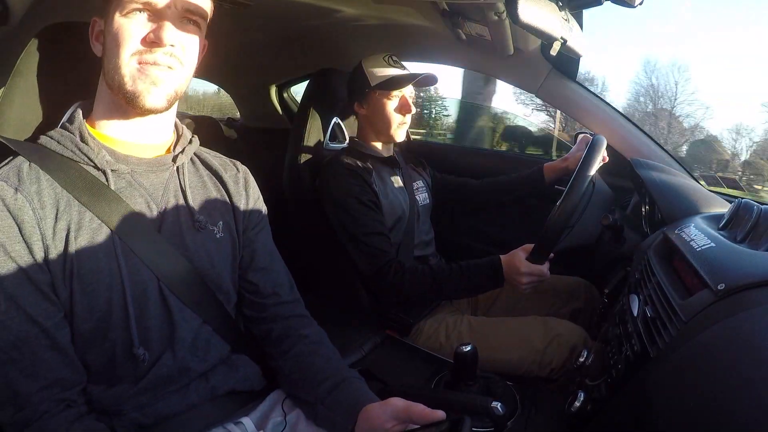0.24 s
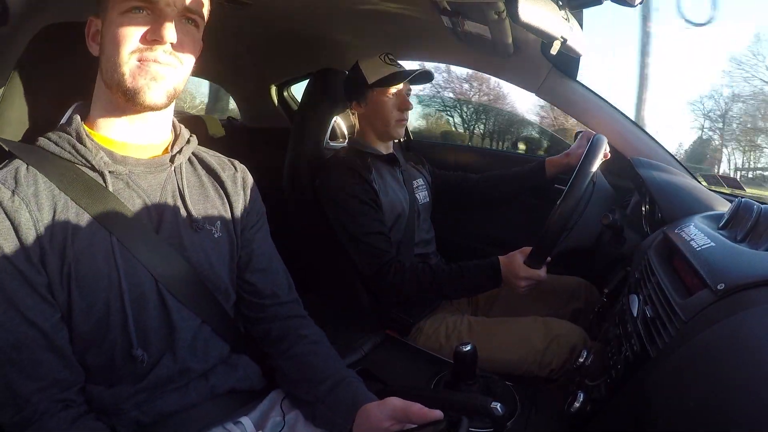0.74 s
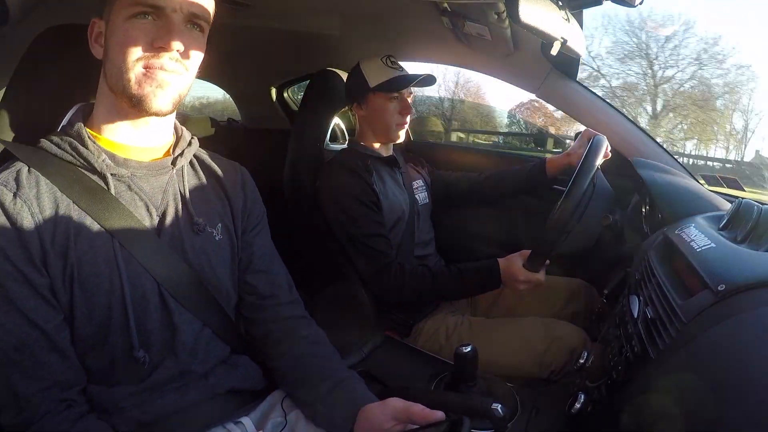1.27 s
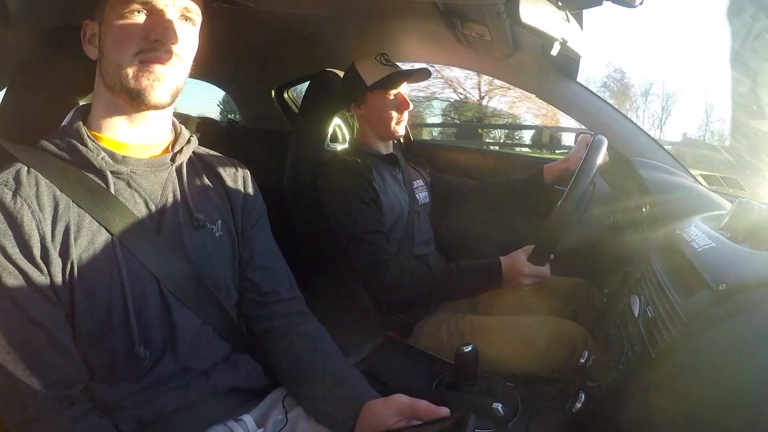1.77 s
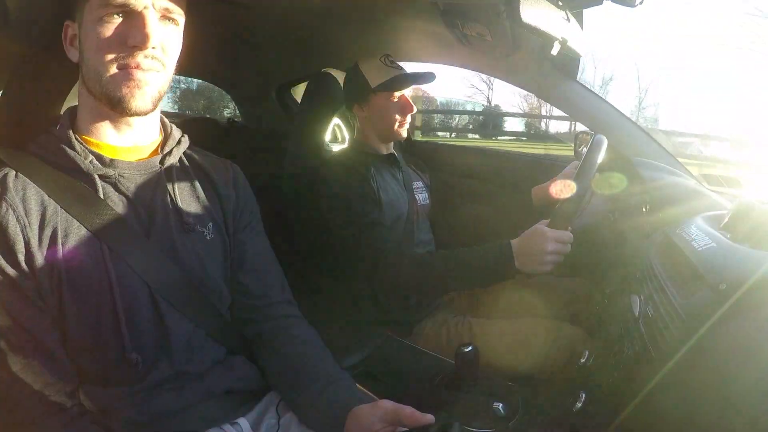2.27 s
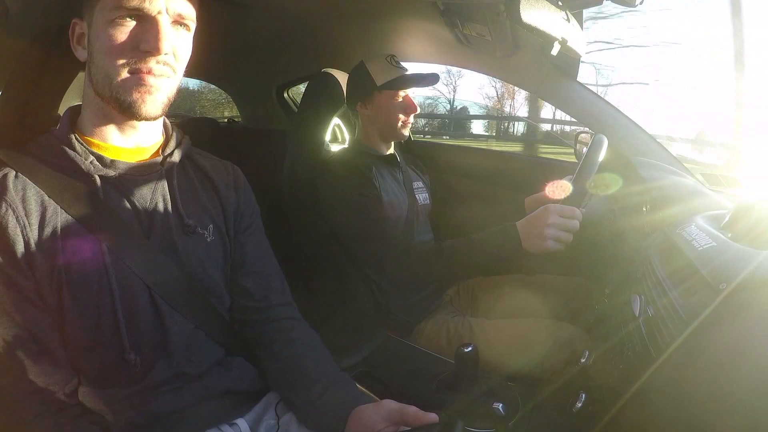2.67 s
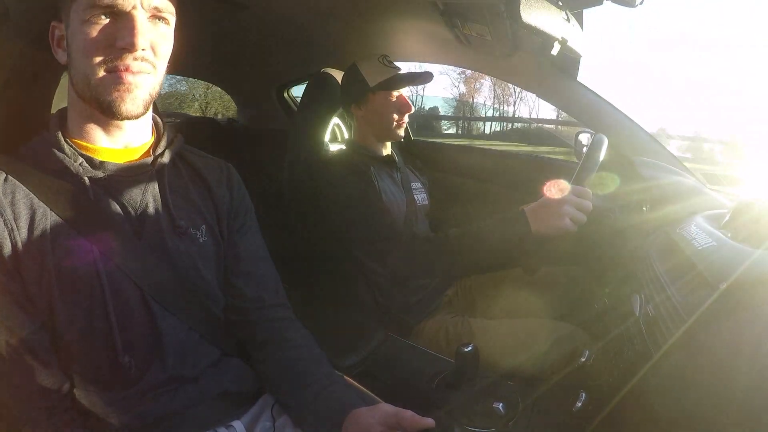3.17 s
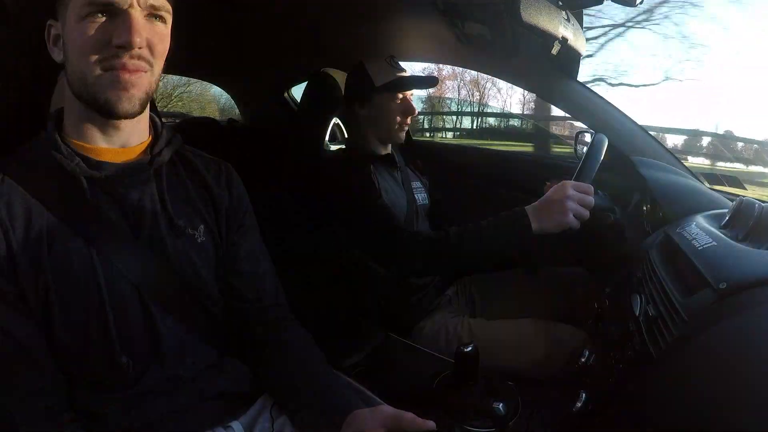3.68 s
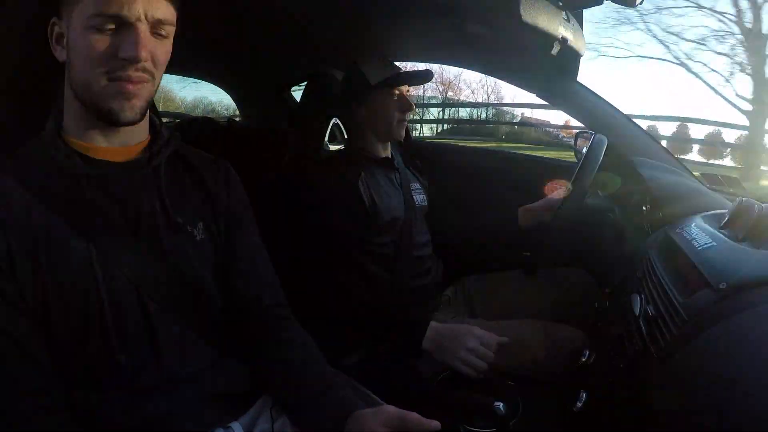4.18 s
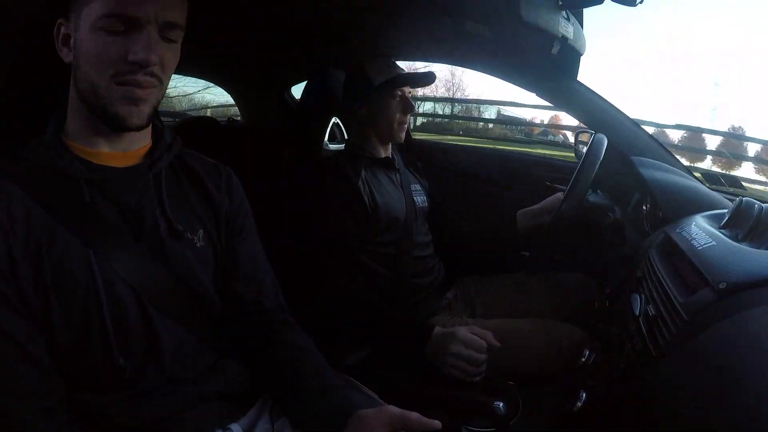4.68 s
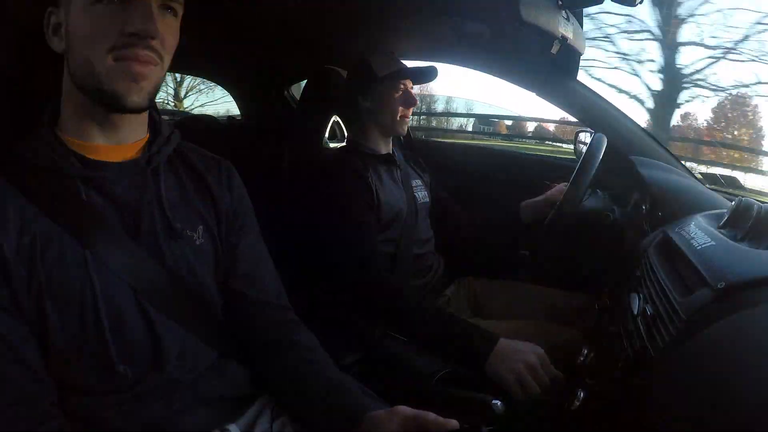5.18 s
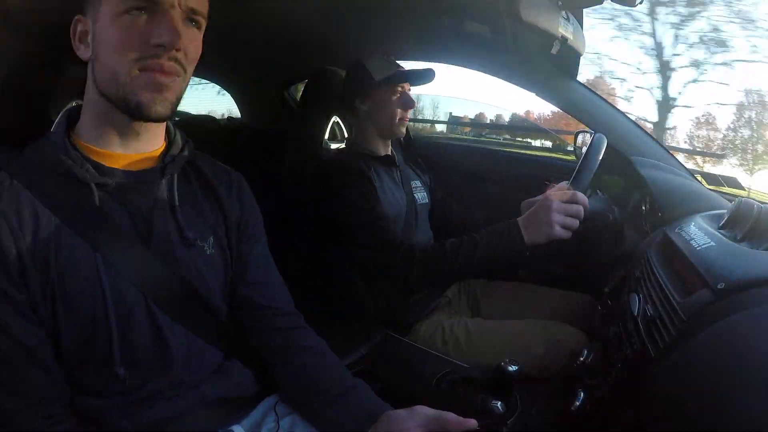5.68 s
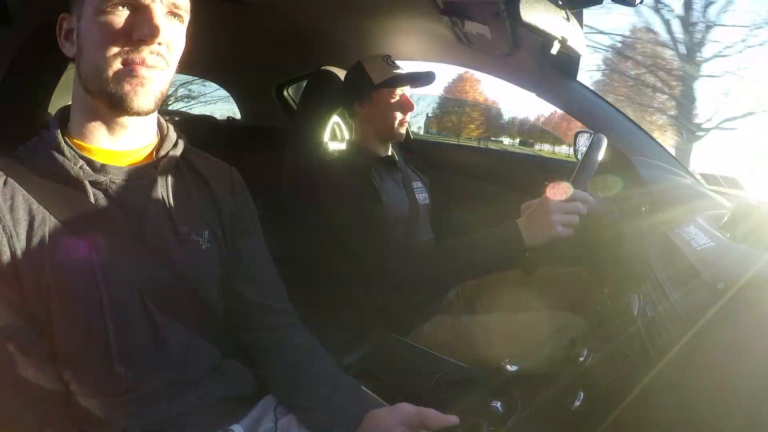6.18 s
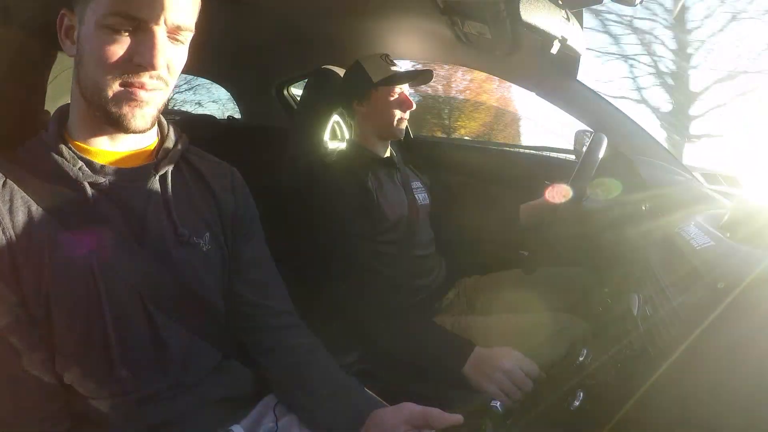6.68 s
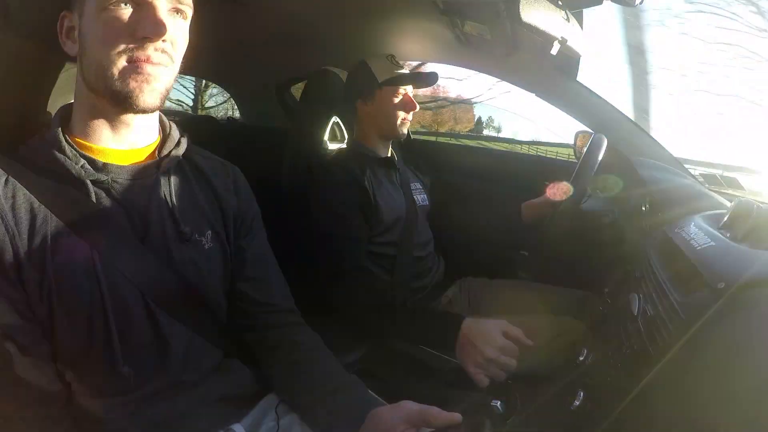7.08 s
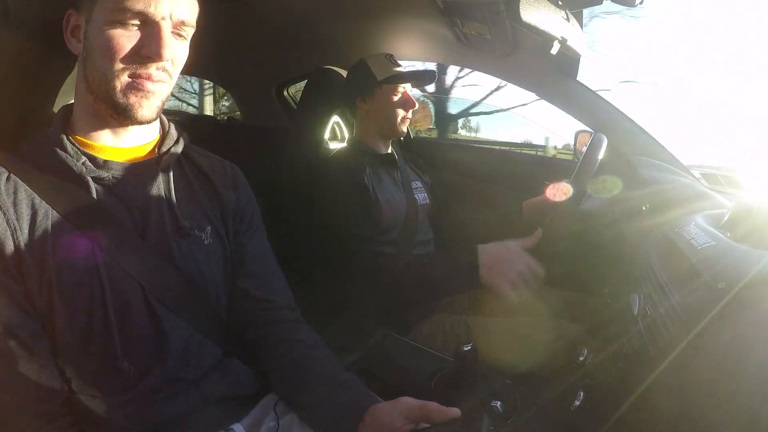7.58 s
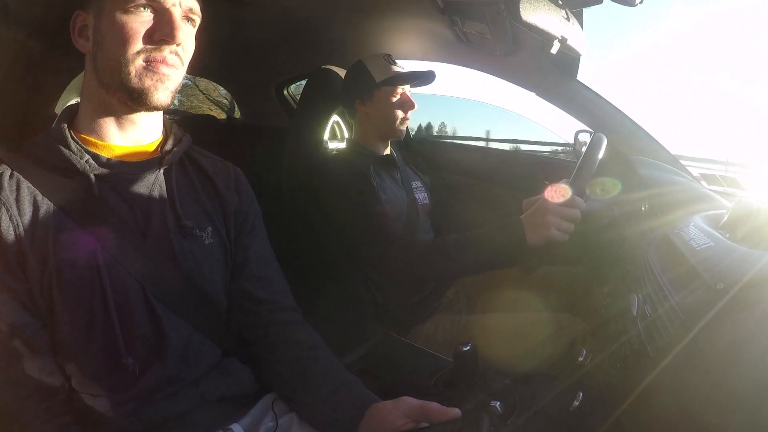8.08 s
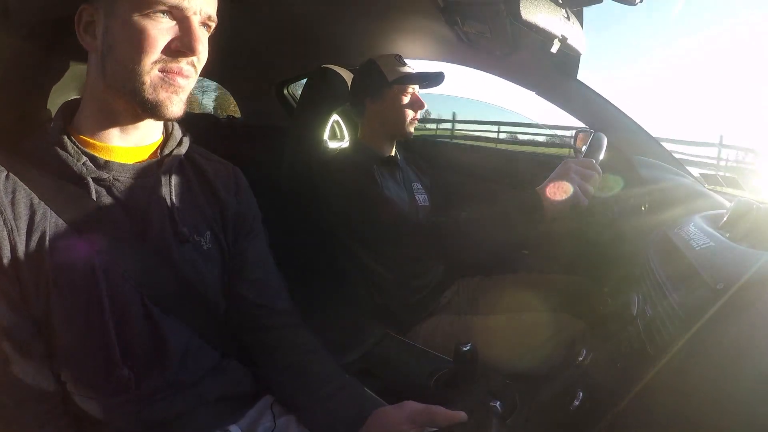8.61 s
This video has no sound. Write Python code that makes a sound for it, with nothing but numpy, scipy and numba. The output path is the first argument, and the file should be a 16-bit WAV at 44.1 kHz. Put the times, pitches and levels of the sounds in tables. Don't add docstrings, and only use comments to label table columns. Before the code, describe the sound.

An outdoor microphone beside the exhaust catches a rotary car accelerating through one gear: soft droning first, then a hard, metallic buzzing pull with rising pitch and hiss. A sudden lift drops the loudness, followed by faltering, a sharp pop and a dull stone knock. The engine coasts down, flares briefly for a downshift, pops and settles. Road roar, buffeting gusts and tiny high metallic clinks surround it.

```python
import sys
import numpy as np
from scipy import signal
from scipy.fft import rfft, irfft, next_fast_len
from scipy.io import wavfile
from scipy.ndimage import uniform_filter1d
from numba import njit

SR = 44100
rng = np.random.default_rng(int(sys.argv[2]) if len(sys.argv) > 2 else 0)


def linear_from_db(decibels):
    return 10 ** (np.asarray(decibels, float) / 20)


def digitize_waveform(pressure):
    field = np.atleast_2d(pressure).T
    bounded = np.clip(field, -1, 1)
    quanta = np.round(bounded * 32767).astype(np.int16)
    wavfile.write(sys.argv[1], SR, quanta)


N = 390279
MID_REVS_HZ = 185

# t/s, f/Hz
PULL_REVS = [(0, 155.7), (.35, 152.3), (1.4, 157.6), (1.8, 162.3), (2.3, 173), (3, 191.9), (3.9, 218),
             (4.5, 234.9), (5.04, 250.2)]
COAST_REVS = [(5.25, 229.7), (5.451, 212.8), (5.54, 208), (5.58, 189.7), (5.68, 168.7), (5.851, 172),
              (6.4, 167.7), (7.18, 155.2), (7.68, 116.3)]
BLIP_REVS = [(7.71, 115.6), (7.78, 141.5), (7.861, 178.8), (7.895, 188.7), (7.971, 198), (8.06, 203.3),
             (8.2, 197.8), (8.4, 190.8), (8.85, 169.6)]
# t/s, opening/0-1
PEDAL = [(.25, 0), (.6, .05), (1.05, .25), (1.15, .35), (1.4, .4), (1.9, .64), (2.3, .86), (2.75, 1.0),
         (5.04, 1.0), (5.055, 0), (7.705, 0), (7.71, .85), (7.78, .75), (7.883, .85), (7.895, 0)]
# deepest t/s, change level/dB, fall/s, recovery/s
STUMBLES = [
    (.23, -13.5, 4.3, 0.23),
    (5.119, -19.5, 0.17, 0.34),
    (5.53, -27, .022, 0.024),
    (5.557, 7.5, .015, .02),
    (5.63, -9, 0.1, 0.058),
    (5.79, -5, 0.11, 0.049),
    (7.703, -16, 0.046, 0.0082),
    (7.895, -8, 0.016, 0.035),
    (7.9, -9.5, 0.017, 0.2),
    (8.105, -23, .025, 0.011),
]
# firing f/Hz, shut level/dB, wide open level/dB
BOOM_ANSWER = [(115, -18, -2.5), (149.4, -21, -6), (178.5, -16, -9), (180, -18, -8.5), (193, -20.5, -10),
               (198, -19.5, -13), (212, -18.5, -8), (247, -15.5, -11.5)]
OCTAVE_ANSWER = [(116, -39.5, -14), (149, -37.5, -29.5), (191, -31.5, -54), (198, -23.5, -51),
                 (213.5, -27, -25), (240, -28, -19), (226, -41, -28.5), (270, -43, -46.5)]
BARK_ANSWER = [(127, -61, -12.5), (139, -43, -5.5), (160.5, -38.5, -11), (172, -31, -10.5),
               (179, -33.5, -9), (216.3, -35.5, -9), (243.7, -27.5, -15.5), (245, -37.5, -13)]
# t/s, level/dB
WHINE = [(0, -43), (.5, -39), (1.2, -38), (2, -54), (8.85, -66)]
# f/Hz, width/Hz, level/dB, dull rotor share/0-1
BARK_MODES = [(484, 44, 6, 0.99), (586, 140, 2, 1), (752, 60, 0.5, 0.29)]
HOT_MODES = [(1222, 215, 11.5, 0.48), (1640, 200, -1, 0.29)]
COOL_MODES = [(1148, 71, 2, 0), (1320, 68, -8.5, 0), (980, 83, -8, .1), (1690, 110, -12, 0)]
EDGE_MODES = [(1716, 180, 0.5, 0.044), (2007, 200, -3.5, 0.15), (2410, 85, -4, 0.022),
              (2990, 200, -35, 0.13), (3784, 73, -10, 0.15), (3950, 133, -12.5, .1), (4150, 250, -10.5, .1)]
# f/Hz, level/dB
GAS_COLOUR = [(1500, -20.5), (2500, -5.5), (3300, -11), (3700, -5), (4200, -3.5), (4700, -7.5), (5400, -10),
              (6000, -6.5), (7100, 1), (8000, -8.5), (10000, -14), (12500, -26.5), (14500, -41),
              (15300, -52)]
# t/s, hiss level/dB, length/s
PUFFS = [
    (5.036, -43.5, 0.054),
    (5.558, -45, 0.015),
    (5.595, -27, .022),
    (5.621, -39, 0.015),
    (7.709, -29.5, 0.02),
    (7.764, -32, 0.023),
    (8.097, -32.5, 0.007),
    (8.105, -53, 0.014),
]
# t/s, peak level/dB, f/Hz, decay/s, first swing/+-1
SURGES = [
    (5.05, -2, 37.2, 0.027, -0.25),
    (5.515, -19, 45, .03, 0.9),
    (5.595, -4, 66, 0.0099, 0.8),
    (5.613, -11, 48, 0.025, -0.94),
    (7.709, -8, 49, 0.03, 1),
    (7.884, -4, 38.24, 0.013, -0.43),
    (8.087, -5, 71, 0.0091, 0.61),
    (8.093, -9.5, 39.5, 0.035, 0.59),
]
# t/s, peak level/dB, upper mode level/dB
TAG_KNOCKS = [(0.1361, -63, -9), (0.2119, -65, -12), (0.3072, -62, -16), (0.385, -52, -19),
              (0.6784, -51, 0), (0.6954, -56, -24), (0.7816, -58, -3), (0.843, -57, -5), (0.8609, -48, -14),
              (0.9522, -53, -18), (1.0799, -48, 1), (1.0994, -45, -12), (5.0894, -48, -4),
              (5.1644, -50, -13), (5.2165, -44, -15), (5.5303, -52, -9), (5.7394, -62, -11),
              (5.7867, -56, -8), (5.8855, -49.5, -2), (5.908, -53, -8), (6.0938, -66, -24),
              (8.299, -67, -9), (8.4257, -55, -21), (8.4906, -55, -7), (8.54, -52, -10), (8.5919, -61, -10),
              (8.6393, -59, -16)]
# t/s, peak level/dB, f/Hz, ring/s
STONE = (5.957, -15, 1000, .025)
# f/Hz, level/dB
ROAD_COLOUR = [(60, -10), (130, 10), (300, 4.5), (780, 0), (1150, 5.5), (1800, -4.5), (2400, -7),
               (2800, -17), (3400, -25), (3900, -16.5), (5000, -27), (7000, -26), (10000, -39),
               (13500, -58)]
# t/s, level/dB
ROAD_LEVEL = [(0, -42.5), (1, -36.5), (2.5, -29), (5.6, -28.5), (6.3, -31.5), (7.5, -33), (8.3, -33),
              (8.85, -36.5)]
# peak t/s, level/dB, half length/s
GUSTS = [(.75, -42, 0.15), (1.333, -47, 0.13), (3.97, -33, .17), (4.804, -37, 0.098), (5.149, -39, 0.31),
         (5.598, -23, 0.057), (6.097, -55, 0.15), (6.565, -46, 0.13), (7.86, -24.5, 0.068),
         (8.3, -55, 0.35)]


def engine():
    hz, pedal, stumble = controls()
    turns = np.cumsum(hz / 2 * (1 + 0.00187 * walk(25))) / SR
    tones = firing_tones(hz, pedal, stumble, turns)
    pulses = exhaust_pulses(hz, pedal, stumble, turns)
    return tones + pulses + gas(hz, pedal, stumble, turns) + rush(hz, pedal)


def controls():
    t = np.arange(N) / SR
    hz, = curves(PULL_REVS + COAST_REVS + BLIP_REVS)
    pedal = np.clip(curves(PEDAL)[0], 0, 1)
    stumble = sum(np.interp(t, (s - fall, s, s + back), (0, db, 0)) for s, db, fall, back in STUMBLES)
    return hz, pedal, (1 - pedal) * stumble


def blend(pedal, shut_db, full_db):
    return shut_db + pedal * (full_db - shut_db)


def unfuelled(pedal):
    return np.exp(-pedal / 0.012)


def answer(rows, hz):
    firing_hz, shut_db, full_db = np.transpose(rows)
    return np.interp(hz, firing_hz, shut_db), np.interp(hz, firing_hz, full_db)


def firing_tones(hz, pedal, stumble, turns):
    angle = 2 * np.pi * turns
    shaft_db = -20 + 0.17 * (hz - 207.5) + 3.1 * walk(15)
    boom = linear_from_db(shaft_db) * np.sin(angle + 0.39) - np.sin(2 * angle + 0.3)
    boom_db = blend(pedal, *answer(BOOM_ANSWER, hz)) + stumble
    whine = linear_from_db(curves(WHINE)[0]) * np.sin(9 * angle)
    load = 0.5 + 0.5 * np.tanh((pedal - 0.7) / 0.2)
    light_db, full_db = answer(OCTAVE_ANSWER, hz)
    octave_gain = load * linear_from_db(full_db) - (1 - load) * linear_from_db(light_db + 0.72 * stumble)
    octave = octave_gain * linear_from_db(1.4 * walk(30)) * np.sin(4 * angle)
    return np.sqrt(2) * (linear_from_db(boom_db + 0.08 * walk(40)) * boom + whine + octave)


def firings(turns):
    firing = np.arange(1, int(2 * turns[-1]))
    late, strong = rng.standard_normal((2, len(firing)))
    at = np.interp(firing / 2, turns, np.arange(N)) + 9e-6 * SR * late
    size = linear_from_db(0.14 * strong)
    return clicks(at[::2], size[::2]), clicks(at[1::2], size[1::2])


def exhaust_pulses(hz, pedal, stumble, turns):
    sharp, dull = firings(turns)
    puff = rng.standard_normal(N) * (0.47 + np.exp(-(2 * turns % 1) / 0.39))
    off_middle_hz = np.abs(hz - MID_REVS_HZ)

    bark_db = blend(pedal, *answer(BARK_ANSWER, hz)) + 0.38 * stumble + 2.4 * np.maximum(stumble, 0)
    lag = np.clip(0.036 * (hz - 193), 0, 0.4)
    bark = linear_from_db(bark_db) * pipe(BARK_MODES, sharp, dull * (1 - lag), 0.0081 * puff, low_hz=382, top_hz=778)

    hot = pipe(HOT_MODES, sharp, dull * pedal ** 0.9, 0.0027 * puff, low_hz=1000, top_hz=2077)
    cool = pipe(COOL_MODES, sharp, dull, 0.002 * puff, low_hz=890, top_hz=1900)
    crack_db = blend(pedal, -42, -16.5 + 0.0046 * off_middle_hz) - 27.5 * unfuelled(pedal)
    crack = linear_from_db(crack_db) * (pedal ** 1.27 * hot + 1.38 * (1 - pedal ** 1.66) * cool)

    edge_db = crack_db - 4.5 + 19 * (pedal - 1) - 0.075 * off_middle_hz
    edge = linear_from_db(edge_db) * pipe(EDGE_MODES, sharp, dull, 0.0025 * puff, low_hz=1450, top_hz=5400)
    return bark + crack + edge


def pipe(modes, sharp, dull, puff, low_hz, top_hz):
    ring = 0
    for hz, width, db, share in modes:
        ring = ring + linear_from_db(db) * svf(sharp + share * dull + puff, float(hz), float(width))
    band = signal.butter(2, (low_hz, top_hz), "band", fs=SR, output="sos")
    return -unit(signal.sosfiltfilt(band, ring))


def gas(hz, pedal, stumble, turns):
    t, angle = np.arange(N) / SR, 2 * np.pi * turns
    gas_db = blend(pedal, -63, -33 + 0.1135 * (hz - MID_REVS_HZ)) + 0.47 * stumble + 2.2
    depth = 0.17 * np.clip(1.3 - hz / 230, 0, 1)
    throb = 1 + depth * (np.cos(2 * angle + 2.0) + 0.5 * np.cos(angle))
    burn = np.zeros(N)
    for s, db, length in PUFFS:
        burn += linear_from_db(db) * np.interp(t, s + length * np.array([0, 0.2, 0.8, 1.2]), [0, 1, 1, 0])
    hiss = (linear_from_db(gas_db) * throb + burn) * roar(GAS_COLOUR, swell_db=0.4, flicker_db=1.0, rate=20)
    return hiss + linear_from_db(-6.5) * burn * twice_filtered_noise(1500.0, 2600.0, 1800.0, 3000.0)


def rush(hz, pedal):
    rush_db = blend(pedal, -39, -30) - 20 * unfuelled(pedal) + 0.18 * pedal * (hz - MID_REVS_HZ)
    return linear_from_db(rush_db + 1.5 * walk(14)) * twice_filtered_noise(150.0, 750.0, 220.0, 1700.0)


def surges():
    out, t = np.zeros(N), np.arange(SR // 4) / SR
    for s, db, hz, decay, swing in SURGES:
        i = int(s * SR)
        out[i:i + len(t)] += 1.73 * swing * linear_from_db(db) * np.sin(2 * np.pi * hz * t) * np.exp(-t / decay)
    return out


def tag():
    s, db, upper_db = np.transpose(TAG_KNOCKS)
    out, t = 0, np.arange(SR // 8) / SR
    lag = rng.uniform(0, 0.013, (len(s), 3))
    lag[:, 0] = 0
    at = ((s[:, None] + lag) * SR).ravel()
    for hz, level_db in ((9010, db), (9730, db + upper_db)):
        hits = clicks(at, np.repeat(0.94 * linear_from_db(level_db), 3))
        ring = np.sin(2 * np.pi * hz * t) * 1000 ** (-t / 0.05)
        out = out + signal.fftconvolve(hits, ring)[:N]
    return out


def stone():
    s, db, hz, ring = STONE
    t = np.maximum(np.arange(N) / SR - s, 0)
    return linear_from_db(db) * np.sin(2 * np.pi * hz * t) * 1000 ** (-t / ring)


def road():
    tyres = linear_from_db(curves(ROAD_LEVEL)[0]) * roar(ROAD_COLOUR, swell_db=0.8, flicker_db=1.5, rate=9)
    body = linear_from_db(-39 + 1.1 * walk(10)) * unit(svf(rng.standard_normal(N), 261.0, 68.0))
    return tyres + body


def wind():
    t = np.arange(N) / SR
    buffet = twice_filtered_noise(25.0, 100.0, 25.0, 120.0) * linear_from_db(3.1 * walk(8.3))
    strength = linear_from_db(-42) + sum(linear_from_db(db) * np.exp(-((t - s) / half) ** 2) for s, db, half in GUSTS)
    return linear_from_db(5.5) * strength * buffet


def roar(shape, swell_db, flicker_db, rate):
    out, swell = 0, swell_db * walk(rate / 4)
    low_hz, top_hz = shape[0][0], shape[-1][0]
    for hz in low_hz * 2 ** np.arange(0, np.log2(top_hz / low_hz), 0.5):
        band = svf(rng.standard_normal(N), hz, hz / 3)
        out = out + linear_from_db(swell + flicker_db * walk(rate)) * band
    return unit(colour(out, shape))


def colour(x, shape):
    hz, db = np.transpose(shape)
    size = next_fast_len(N)
    f = np.fft.rfftfreq(size, 1 / SR) + 1
    gain = linear_from_db(np.interp(np.log(f), np.log(hz), db, right=-120))
    return irfft(rfft(x, size) * gain, size)[:N]


def twice_filtered_noise(hz, width, second_hz, second_width):
    return unit(svf(svf(rng.standard_normal(N), hz, width), second_hz, second_width))


@njit
def svf(x, hz, width):
    y, band, low = np.empty(len(x)), 0., 0.
    g, k = np.tan(np.pi * hz / SR), width / hz
    for i in range(len(x)):
        v = (band + g * (x[i] - low)) / (1 + g * (g + k))
        band, low = 2 * v - band, low + 2 * g * v
        y[i] = k * v
    return y


def walk(rate):
    k = int(SR / rate)
    held = np.repeat(rng.standard_normal(N // k + 1), k)
    return 1.32 * uniform_filter1d(uniform_filter1d(held, k), k)[:N]


def clicks(at, size):
    out, i = np.zeros(N + 2), np.clip(at, 0, N).astype(int)
    np.add.at(out, i, size * (1 - at % 1))
    np.add.at(out, i + 1, size * (at % 1))
    return out[:N]


def curves(rows):
    s, *columns = np.transpose(rows)
    return [np.interp(np.arange(N) / SR, s, c) for c in columns]


def unit(x):
    return x / np.sqrt(np.mean(x ** 2))


def scene():
    return (engine() + surges() + tag() + stone() + road() + wind())[None]


def top_cut(x):
    return signal.sosfilt(signal.butter(12, 15600, fs=SR, output="sos"), x)


def record(dry):
    clipped = np.clip(dry, -0.98, 0.98)
    mix = signal.sosfilt(signal.butter(4, 13500, fs=SR, output="sos"), clipped)
    return top_cut(mix)


dry = scene()
out = record(dry)
digitize_waveform(out)
```